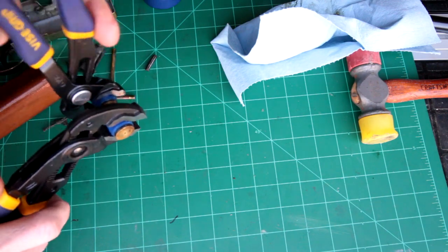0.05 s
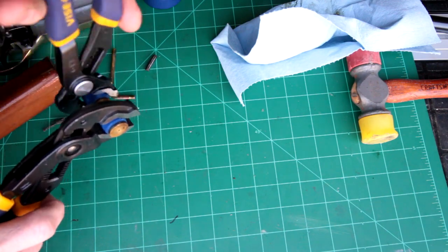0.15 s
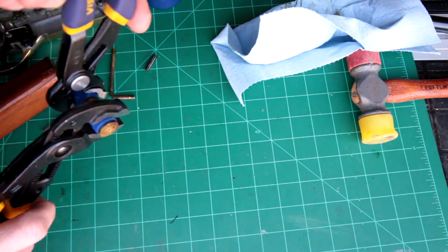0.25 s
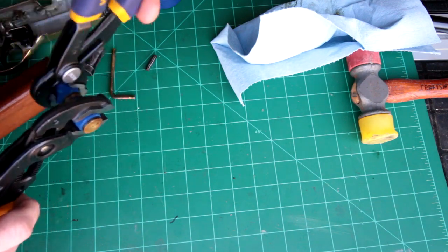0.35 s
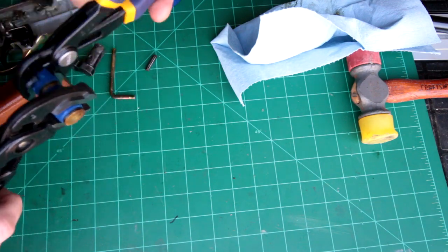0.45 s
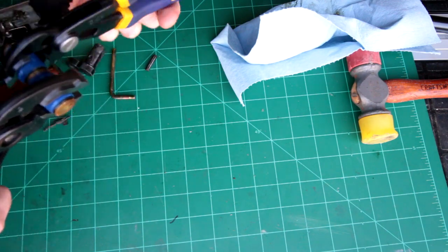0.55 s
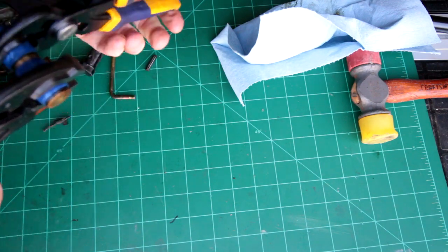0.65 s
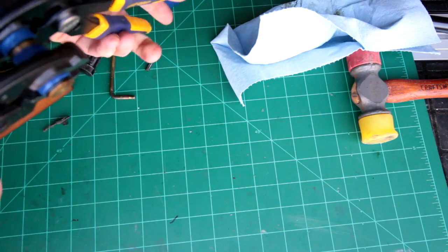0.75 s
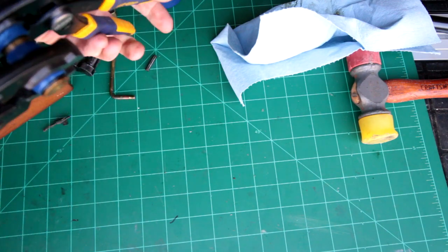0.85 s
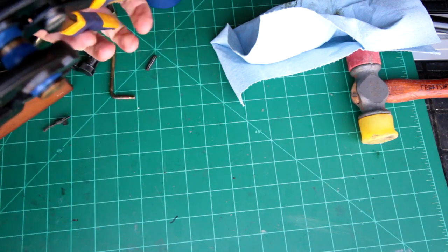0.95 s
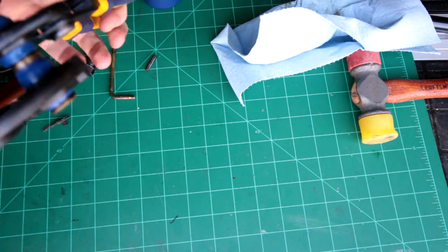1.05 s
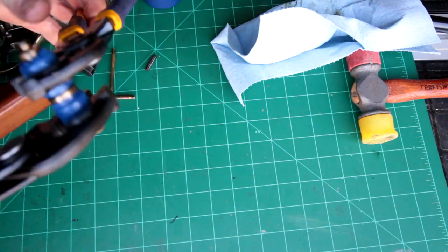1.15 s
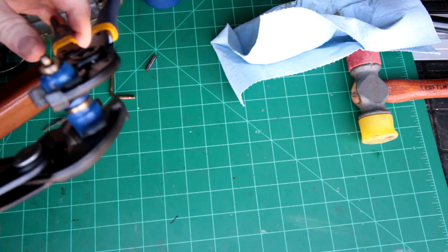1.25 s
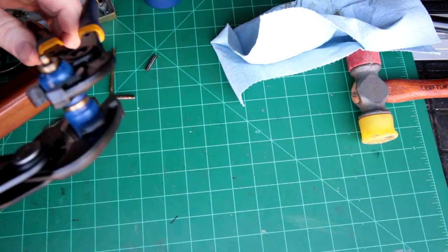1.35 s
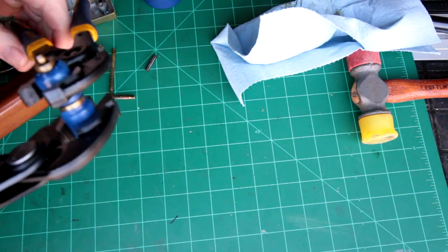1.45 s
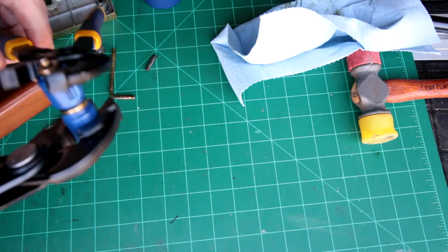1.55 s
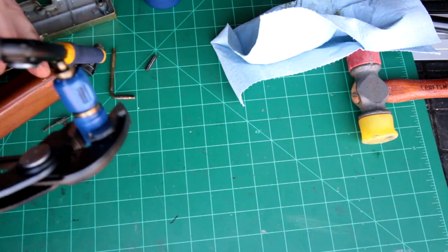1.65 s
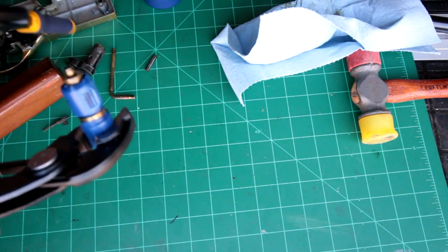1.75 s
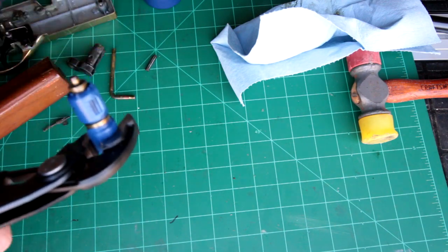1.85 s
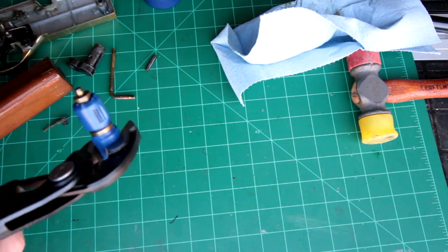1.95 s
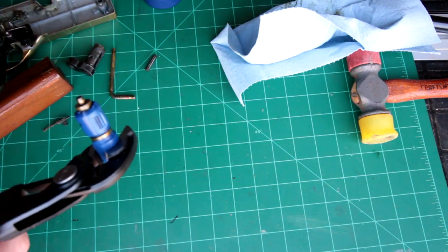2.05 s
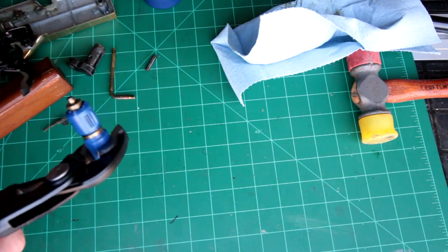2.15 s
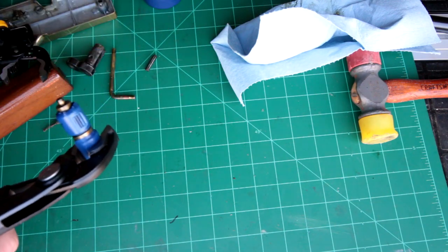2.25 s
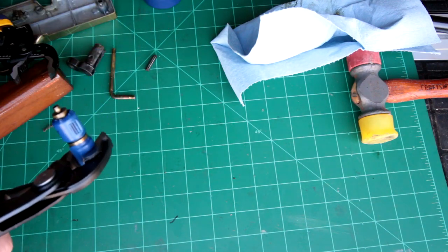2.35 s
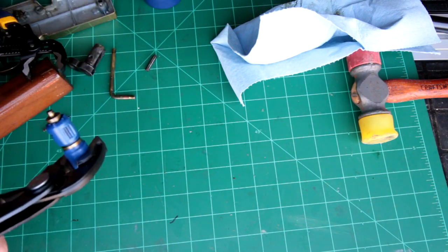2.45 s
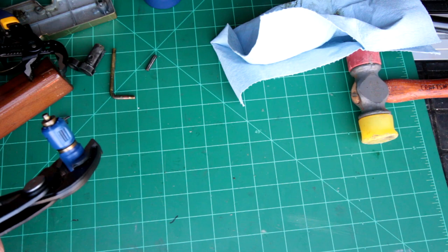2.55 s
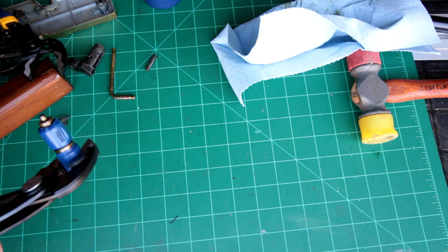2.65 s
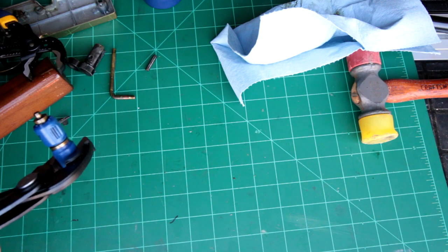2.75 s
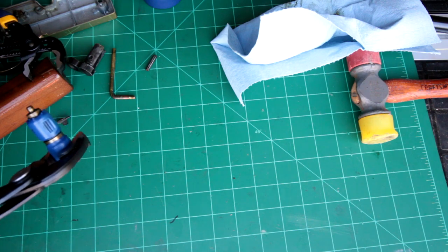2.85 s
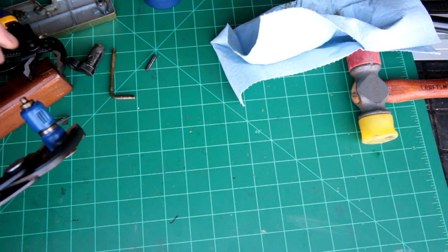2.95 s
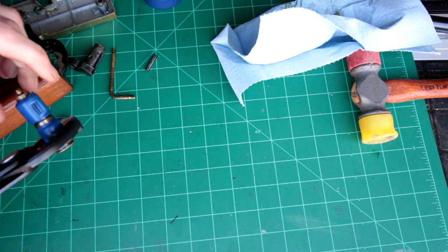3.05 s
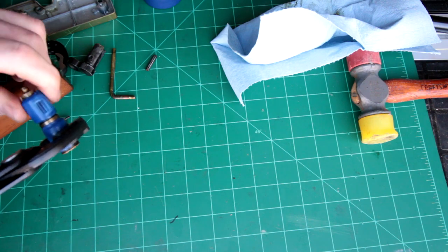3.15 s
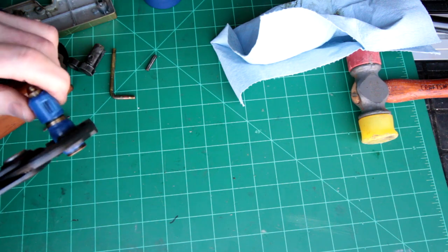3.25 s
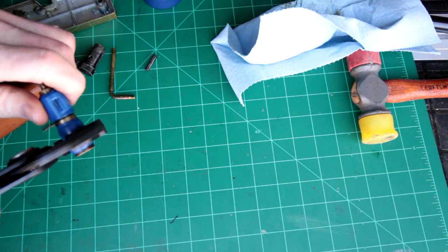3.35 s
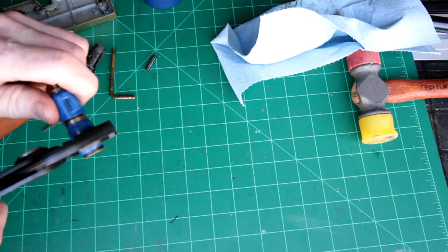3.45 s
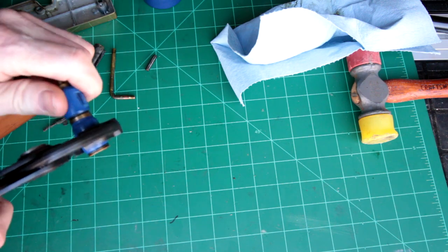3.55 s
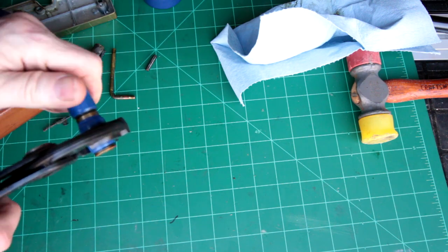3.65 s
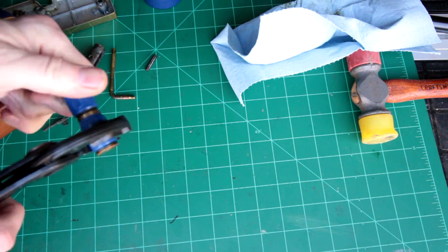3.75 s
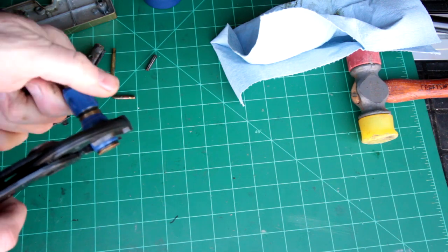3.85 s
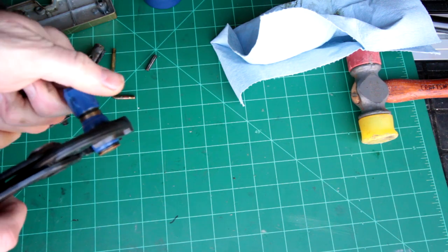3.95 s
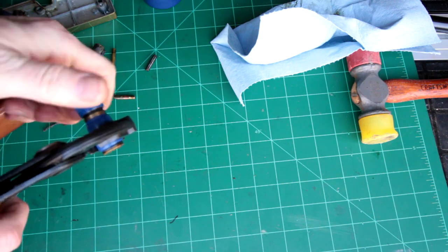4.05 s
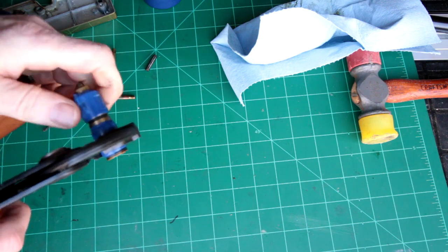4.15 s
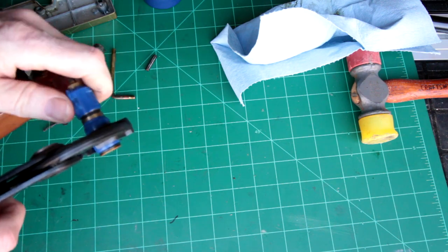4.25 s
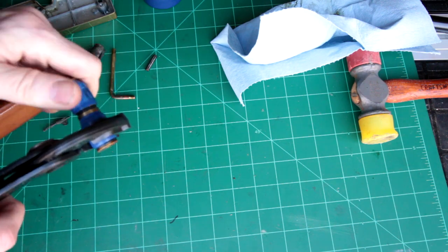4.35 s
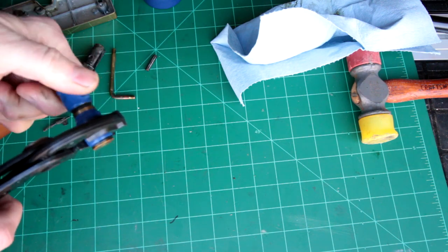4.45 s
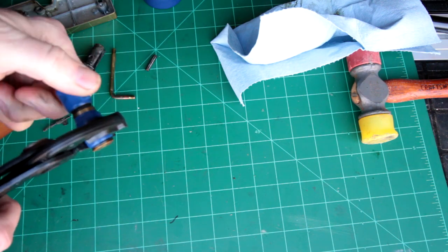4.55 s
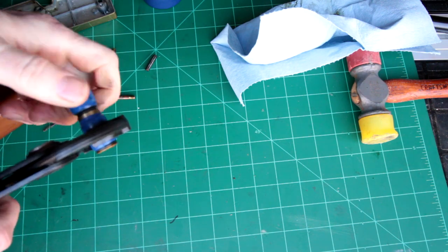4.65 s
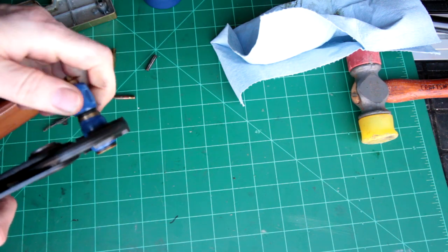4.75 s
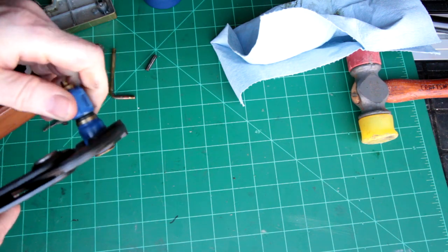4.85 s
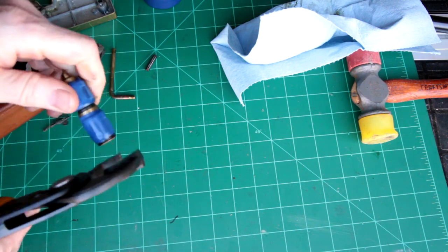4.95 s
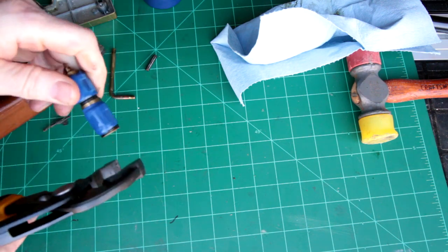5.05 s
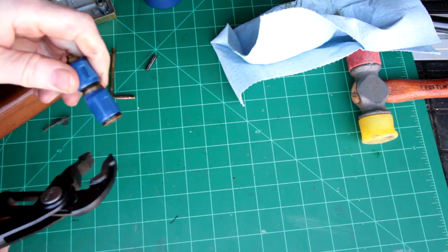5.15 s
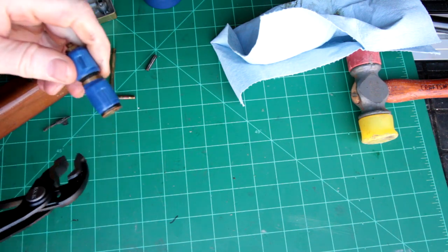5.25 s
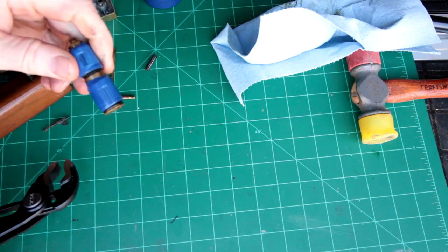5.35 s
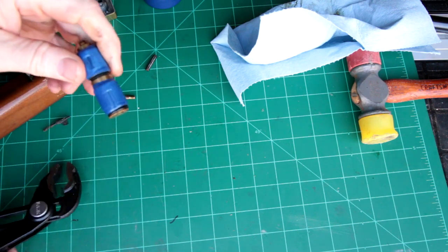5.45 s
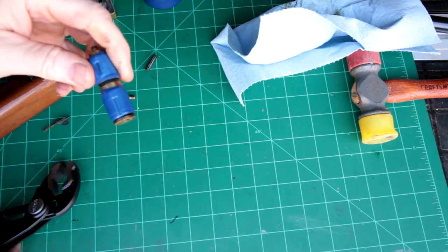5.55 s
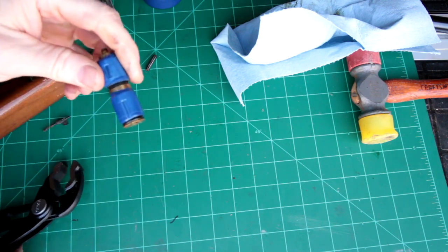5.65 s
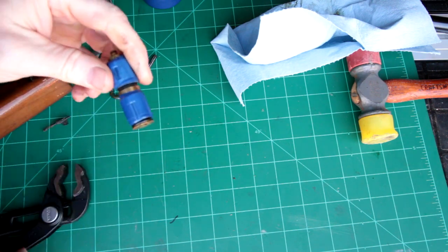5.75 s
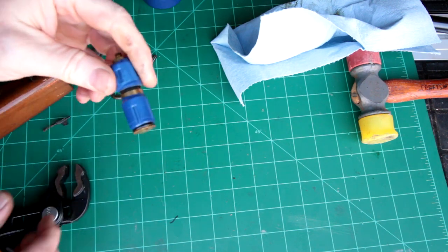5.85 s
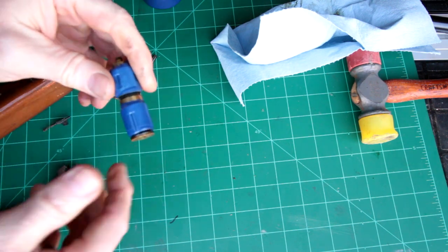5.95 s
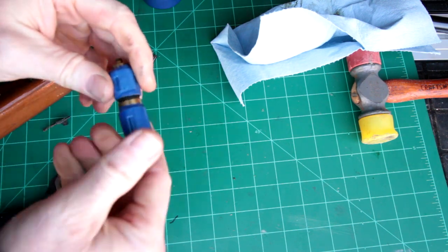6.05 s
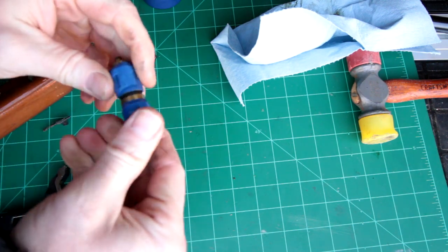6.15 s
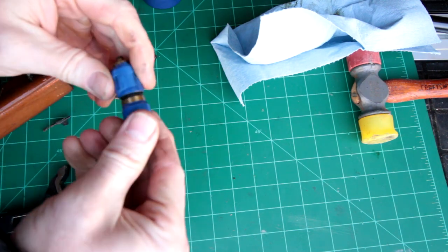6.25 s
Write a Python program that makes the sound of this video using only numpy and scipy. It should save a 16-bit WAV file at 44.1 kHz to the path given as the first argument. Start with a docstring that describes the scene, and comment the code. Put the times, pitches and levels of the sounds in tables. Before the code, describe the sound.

Small pliers clatter onto a mat-covered bench with a bright ring; after quiet scraping, heavier pliers click and land in three thuds.

```python
"""Two pairs of steel pliers let go of a small metal part and are laid on a mat-covered workbench in turn.
Their joints click; each pair lands in a cluster of blows that thump the bench and ring the steel.
The microphone is near-mono, on a stand that the bench sets trembling.
A small room answers behind the tools, over a faint rumble and hiss."""
import sys
import numpy as np
from scipy import signal
from scipy.fft import rfft, irfft, next_fast_len
from scipy.io import wavfile
from scipy.ndimage import map_coordinates

SR = 44100
rng = np.random.default_rng(int(sys.argv[2]) if len(sys.argv) > 2 else 0)


def to_wav(s):
    """Save 16-bit WAV."""
    ch = np.atleast_2d(s).T  # columns
    pcm = np.round(np.clip(ch, -1, 1) * 32767)  # PCM
    wavfile.write(sys.argv[1], SR, pcm.astype(np.int16))


N = 278712

# each pair's blows on the bench: t/s, thud/dB, thud pitch/Hz, roll from tip to heel/s, snap/dB, ring/dB
SMALL_LANDING = [(2.2395, -17, 499, .006, -27.5, -15.5), (2.266, -22.5, 935, .006, -58, -48),
                 (2.2765, -31, 331, 0.0037, -50, -19), (2.2833, -26.5, 331.4, .015, -46, -25),
                 (2.5781, -23.5, 255, .005, -43.5, -56), (2.587, -30, 950, 0.005, -75, -47.5)]
LARGE_LANDING = [(5.5172, -18.5, 331, 0.0014, -53, -55.5), (5.705, -19.5, 443, 0.014, -34.5, -29),
                 (5.8753, -9, 282, .003, -25, -24.5)]
# modes of the large pliers: f/Hz, level/dB, t60/s
LARGE_MODES = [(2173, 13, 0.066), (2440, -0.5, .03), (3890, -14, 0.2), (4050, -16, .14), (5140, 5, 0.036),
               (7923, -18, .03), (10900, -13.5, .03)]
# spectrum of a hard contact: f/Hz, level/dB
CLACK_SPECTRUM = [(150, -23), (600, 1.5), (1100, 1.5), (1650, 0.5), (2200, 3), (3600, -7.5), (5000, -13),
                  (7000, -35.5), (16000, -52.5)]


def small_pliers():
    """The small pair drops, rattles with a bright ring and tips over onto its handles."""
    # modes of the steel: f/Hz, level/dB, t60/s
    modes = [(1974, -16, 0.12), (2574, -3.5, 0.13), (2664, 10, 0.11), (2790, -6.5, 0.093), (2850, -8, .08),
             (3237, -10, 0.14), (3320, -10, 0.15), (3690, -8.5, 0.071), (4100, -20, .16),
             (4960, -17.5, 0.0894), (5320, -16, 0.063), (6995, -20.5, .15), (7810, -17.5, 0.082),
             (9167, -27.5, 0.062), (12807, -39.5, .04)]

    def steel():
        return blow(ring(modes, blur_hz=9))
    return landing(SMALL_LANDING, steel, heel_db=-5, wet_db=-14)


def large_pliers():
    """The heavy pair lands in three blows; its loose halves buzz together."""
    # spectrum of the buzz: f/Hz, level/dB
    rattle = [(1500, -18), (2700, -8), (3200, 2.5), (3450, 10), (4200, -19), (5300, -8.5), (7000, -36),
              (12000, -53.5)]

    def steel():
        buzz = burst(rattle, t60=0.017) + amp(-18.5) * burst(rattle, t60=0.36)
        return buzz + amp(-4) * blow(ring(LARGE_MODES, blur_hz=39.9))
    return landing(LARGE_LANDING, steel, heel_db=-0.5, wet_db=-14)


def landing(blows, steel, heel_db, wet_db, heel_pitch_ratio=0.42):
    """Each blow thuds tip first, chatters as the tool rolls over, and ends on the duller padded heel."""
    # clashes of the loose halves: share of the roll, level/dB
    chatter = [(0, -7.5), (.26, -1.5), (0.548, -7)]
    out = np.zeros(N)
    for s, thud_db, pitch_hz, roll_s, snap_db, ring_db in blows:
        clack_db = thud_db - 3 + 0.27 * (ring_db - thud_db)  # the more bare steel meets, the more clack
        tip = amp(thud_db) * thud(pitch_hz)
        heel = amp(thud_db + heel_db) * thud(heel_pitch_ratio * pitch_hz, bench_db=-11)
        sound = tip + delayed(heel, roll_s)
        for share, db in chatter:
            clack = amp(clack_db) * burst(CLACK_SPECTRUM, t60=0.025)
            clash = clack + snap(snap_db) + amp(ring_db) * steel()
            sound += amp(db) * delayed(clash, share * roll_s)
        add(out, s, in_room(sound, wet_db))
    return out


def thud(pitch_hz, bench_db=-7, clatter_db=-9):
    """The mat cushions a blow to one short swing, quicker for a harder contact; the bench top rings on."""
    # modes of the bench top: f/Hz, level/dB, t60/s
    bench_modes = [(92, -5.5, 0.41), (158.5, -4, 0.16), (187.6, -11, 0.27), (291.1, -1.5, 0.15),
                   (324.4, -6, 0.27), (442, -3, 0.14), (487, -4, 0.033), (560.4, -8, 0.089),
                   (635.3, -11, 0.053), (830, -5.5, 0.092), (1085, -10, 0.14), (1220, -9, 0.078)]
    # spectrum of the bench's many close, quickly damped modes: f/Hz, level/dB
    dense_modes = [(45, -21.5), (85, 2), (160, -4.5), (290, 2), (450, -0.5), (700, -4), (1100, -7.5),
                   (1700, -13.5), (4000, -31), (9000, -60)]
    t = age()
    phase = 2 * np.pi * pitch_hz * t
    displacement = np.sin(phase) * (1 - np.exp(-phase)) * np.exp(-0.36 * phase)
    swing = np.diff(displacement, prepend=0)
    force = phase ** 2 * np.exp(-2 * phase)
    top = signal.fftconvolve(force, ring(bench_modes, blur_hz=0.82, scatter_phase=0.53))[:len(t)]
    clatter = burst(dense_modes, t60=0.07)
    return -blow(blow(swing) + amp(bench_db) * blow(top) + amp(clatter_db) * clatter)


def snap(db, hard_db=-32, dulling=0.42):
    """Steel meets steel in a short crack; the lighter the touch, the less top it has."""
    # spectrum of a hard crack: f/Hz, level/dB
    crack = [(1500, -26), (4000, 0.5), (6000, -1), (8000, -1.5), (10000, -6), (12000, -1.5), (14000, -7),
             (16000, -7.5)]
    slope_db = max(dulling * min(db - hard_db, 0), -12)  # per octave
    spectrum = [(hz, level + slope_db * np.log2(max(hz / 6000, 1))) for hz, level in crack]
    return amp(db) * burst(spectrum, t60=0.019)


def ring(modes, blur_hz, scatter_phase=2):
    """Damped modes, struck at new strengths each time; shifting contact makes their pitch jitter."""
    hz, db, t60 = np.transpose(modes)[:, :, None]
    strength_db, phase = rng.standard_normal((2, len(hz), 1))
    t = age()
    steps = rng.standard_normal((len(hz), len(t)))
    jitter = np.cumsum(steps, axis=1) * np.sqrt(2 * np.pi * blur_hz / SR)
    envelope = amp(db + strength_db - 60 * t / t60)
    return np.sum(envelope * np.cos(2 * np.pi * hz * t + scatter_phase * phase + jitter), axis=0)


def burst(spectrum, t60):
    """Rough faces meet: a spray of tiny impacts that quickly dies away."""
    t = age()
    spray = rng.standard_normal(len(t)) * amp(-60 * t / t60)
    return blow(coloured(spray, spectrum))


def settling(clack_db=-12, snap_db=-29.5):
    """Between blows the tools rock on the mat: light taps, too soft to ring the steel."""
    # taps on the mat: t/s, thud/dB
    taps = [(2.393, -33.5), (2.571, -40.5), (5.552, -25.5), (5.6189, -43.5), (5.6585, -48), (5.693, -39),
            (5.9077, -23.5), (5.9689, -27.5), (6.005, -41.5)]
    out = np.zeros(N)
    for s, db in taps:
        tap = thud(pitch_hz=190) + amp(clack_db) * burst(CLACK_SPECTRUM, t60=0.025)
        add(out, s, in_room(amp(db) * tap + snap(db + snap_db), wet_db=-10.5))
    return out


def joint(play_s=0.0018, touch_db=-4):
    """Held in the air, the jaws click against their pivot with no thump."""
    # clicks of the loose joint: t/s, click/dB, ring/dB
    clicks = [(1.75, -45, -58.5), (5.282, -82, -65), (5.4206, -35.5, -46.5)]
    # spectrum of a click: f/Hz, level/dB
    spectrum = [(200, -19), (700, -19.5), (1150, -6.5), (2100, -2.5), (3200, 0), (3900, 4.5), (5200, -19.5),
                (7600, -8.5), (9500, -24), (11000, -28), (16000, -35)]
    out = np.zeros(N)
    for s, click_db, ring_db in clicks:
        touch, click = (amp(click_db) * burst(spectrum, t60=0.011) for _ in range(2))
        steel = amp(ring_db) * blow(ring(LARGE_MODES, blur_hz=10))
        # a lighter touch comes first, as the play is taken up
        sound = amp(touch_db) * touch + delayed(click + steel, play_s)
        add(out, s - play_s, in_room(sound, wet_db=-15.5))
    return out


def handling():
    """Soft nudges, short gritty slides and dull rubs while the part is worked loose."""
    # fingers and jaws nudge the part: t/s, tick/dB, bump/dB, bump pitch/Hz
    nudges = [(0.406, -88, -61, 127), (.87, -74, -62.5, 398), (3.24, -85, -59, 149),
              (4.968, -66, -70.5, 300), (4.998, -67, -57, 338), (5.077, -66, -59, 350)]
    # the jaws slide on the part: centre t/s, half-length/s, level/dB
    slides = [(.39, 0.042, -66), (.72, 0.093, -66.5), (1.19, .08, -73.5), (2.70, 0.032, -69),
              (3.91, .06, -72.5), (4.945, 0.01, -63), (5.29, 0.066, -68)]
    # a hand or a handle rubs over the bench: centre t/s, half-length/s, level/dB
    rubs = [(1.22, 0.22, -69.5), (2.528, .02, -46), (3.25, 0.37, -66.5), (5.12, .35, -65.5)]
    # spectra of a slide and a rub: f/Hz, level/dB
    slide_spectrum = [(400, -22), (1400, -10), (2050, -11.5), (2600, -11), (3450, -3), (4000, -12),
                      (4700, -32), (12000, -30)]
    rub_spectrum = [(150, -37.5), (250, -12.5), (310, 5.5), (400, -18), (560, -12), (900, -20.5),
                    (1800, -23.5), (4000, -40)]
    out = np.zeros(N)
    for s, tick_db, bump_db, pitch_hz in nudges:
        nudge = amp(tick_db) * burst(CLACK_SPECTRUM, t60=0.037) + amp(bump_db) * thud(pitch_hz)
        add(out, s, in_room(nudge, wet_db=-8))
    for strokes, spectrum in ((slides, slide_spectrum), (rubs, rub_spectrum)):
        for s, half_s, db in strokes:
            swell = np.hanning(round(2 * half_s * SR))
            grit = rng.standard_normal(len(swell)) * rng.exponential(size=len(swell))
            add(out, s - half_s, amp(db) * swell * unit(coloured(grit, spectrum)))
    return out


def microphone_stand(sway_hz=33, sway_db=-35, rise_s=0.02, t60=1.3):
    """Every blow on the bench sets the microphone stand trembling at its low resonance."""
    # a soft push on the bench shakes the stand again: t/s, level/dB
    push = (6.05, -36)
    t = np.arange(N) / SR
    drift = 0.12 * map_coordinates(rng.standard_normal(128), [t * 12])
    swing = np.sqrt(2) * np.sin(2 * np.pi * np.cumsum(sway_hz * (1 + drift)) / SR)
    kicks = [(s, thud_db + sway_db) for s, thud_db, *_ in SMALL_LANDING + LARGE_LANDING] + [push]
    power = np.zeros(N)
    for s, db in kicks:
        since = np.maximum(t - s, 0)
        rise = np.minimum(since / rise_s, 1)
        power += (rise * amp(db - 60 * since / t60)) ** 2
    return np.sqrt(power) * swing


def in_room(x, wet_db, gap_s=0.005):
    """The direct sound and the small room's reflections, which differ for every spot on the bench."""
    # decay of the room: f/Hz, t60/s
    decay = [(80, 0.58), (300, 0.24), (1000, 0.29), (3500, 0.23), (6000, 0.16), (14000, 0.41)]
    # spectrum of the reflections: f/Hz, level/dB
    spectrum = [(40, -14), (120, -3.5), (400, 1), (1000, -0.5), (4400, -0.5), (5800, -3), (14000, -14)]
    hz, t, bands = signal.stft(rng.standard_normal(SR // 2), SR, nperseg=256)
    tail = signal.istft(bands * amp(-60 * t / along(decay, hz)[:, None]), SR, nperseg=256)[1]
    tail = coloured(tail / np.linalg.norm(tail), spectrum)
    echo = signal.fftconvolve(x, np.pad(tail, (round(gap_s * SR), 0)))[:len(x)]
    return x + amp(wet_db) * echo


def noise_floor(level_db=-65):
    """Room rumble, alike in both channels, and microphone hiss, which is not."""
    # rumble and hiss: f/Hz, level/dB
    spectrum = [(18, -34.5), (30, -3.5), (130, -1), (173, -9.5), (299, -7), (359, -12.5), (432, -13),
                (656, -17), (3490, -21), (15500, -24.5)]
    # stereo width: f/Hz, side minus mid/dB
    width = [(60, -10), (180, -13), (550, -4), (1650, -3.5), (4970, -1), (15000, 0.5)]
    mid, side = (unit(coloured(noise, spectrum)) for noise in rng.standard_normal((2, N)))
    side = coloured(side, width)
    return amp(level_db) * np.array([mid + side, mid - side])


def delayed(x, s):
    """The same sound, s seconds later."""
    return np.pad(x, (round(s * SR), 0))[:len(x)]


def scene():
    """Everything on the bench sits in the centre of the stereo image."""
    tools = small_pliers() + large_pliers() + settling() + joint() + handling()
    return tools + microphone_stand() + noise_floor()


def record(dry, top_hz=15800):
    """The recorder clips at full scale and cuts off steeply at its band limit."""
    m = next_fast_len(N + SR // 2)
    lowpass = 1 / (1 + (np.fft.rfftfreq(m, 1 / SR) / top_hz) ** 120)
    return irfft(rfft(np.clip(dry, -1, 1), m) * lowpass, m)[..., :N]


def amp(db):
    """Decibels to gain."""
    return 10 ** (np.asarray(db) / 20)


def unit(x):
    """Scale to rms 1."""
    return x / np.sqrt(np.mean(x ** 2) + 1e-20)


def blow(x):
    """Scale a short sound so that its energy equals 10 ms at rms 1."""
    return x / np.sqrt(np.sum(x ** 2) / (SR / 100) + 1e-20)


def along(points, hz):
    """Read (Hz, value) points on a log axis."""
    f, v = np.transpose(points)
    return np.interp(np.log(hz + 1), np.log(f), v)


def age():
    """Seconds since a blow, over half a second."""
    return np.arange(SR // 2) / SR


def add(track, s, x):
    """Mix x into the track from time s."""
    start = round(s * SR)
    track[..., start:start + x.shape[-1]] += x[..., :max(N - start, 0)]


def coloured(x, points):
    """Causal filter with the gain of (Hz, dB) points."""
    m = 2 * next_fast_len(x.shape[-1])
    cepstrum = irfft(np.log(amp(along(points, np.fft.rfftfreq(m, 1 / SR)))))
    cepstrum[1:m // 2] *= 2  # fold to minimum phase
    cepstrum[m // 2 + 1:] = 0
    return irfft(rfft(x, m) * np.exp(rfft(cepstrum)), m)[..., :x.shape[-1]]


dry = scene()
out = record(dry)
to_wav(out)
```